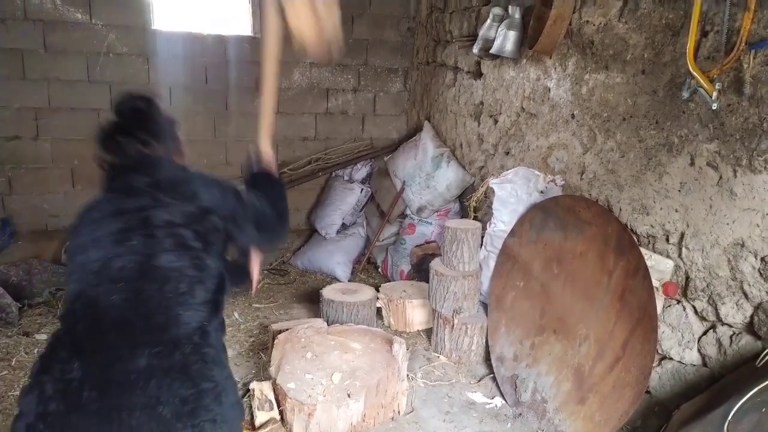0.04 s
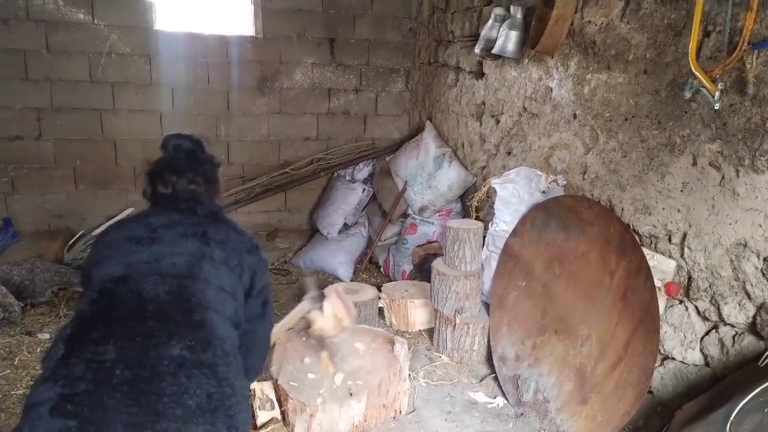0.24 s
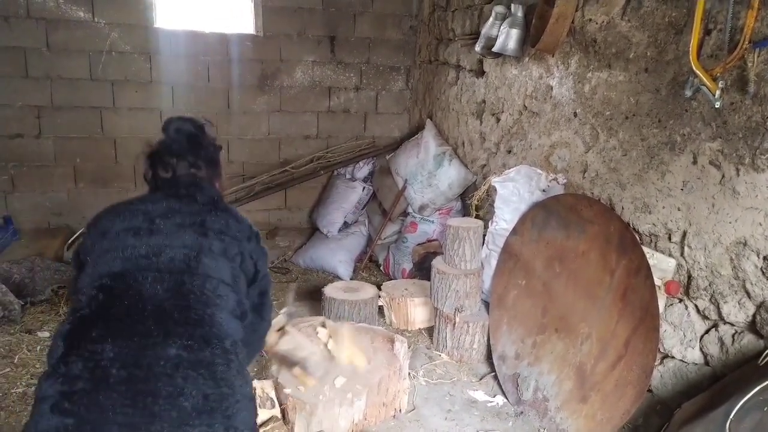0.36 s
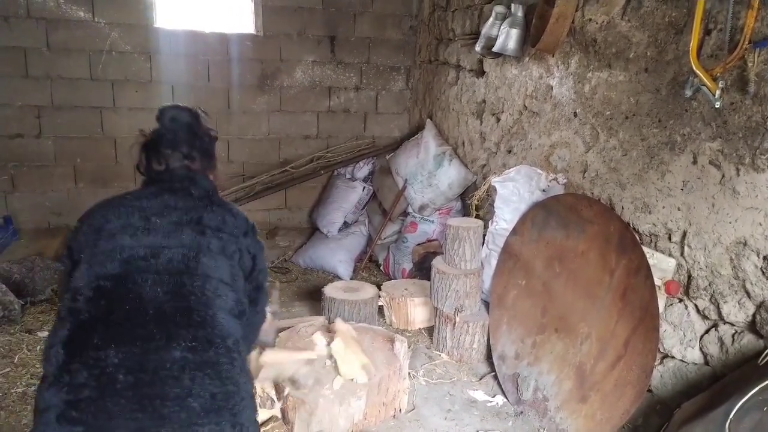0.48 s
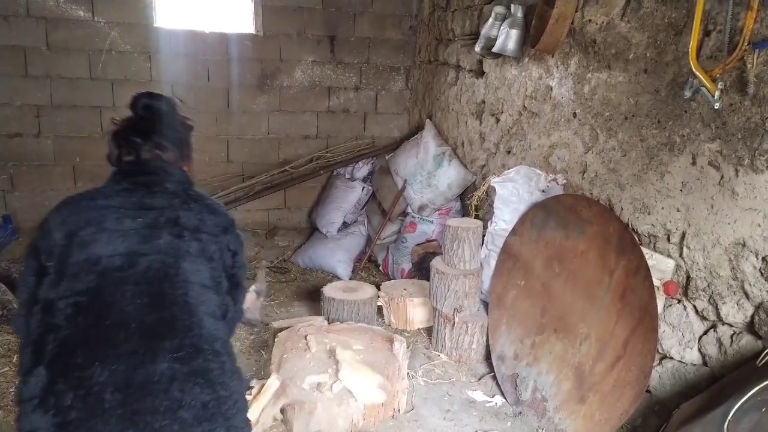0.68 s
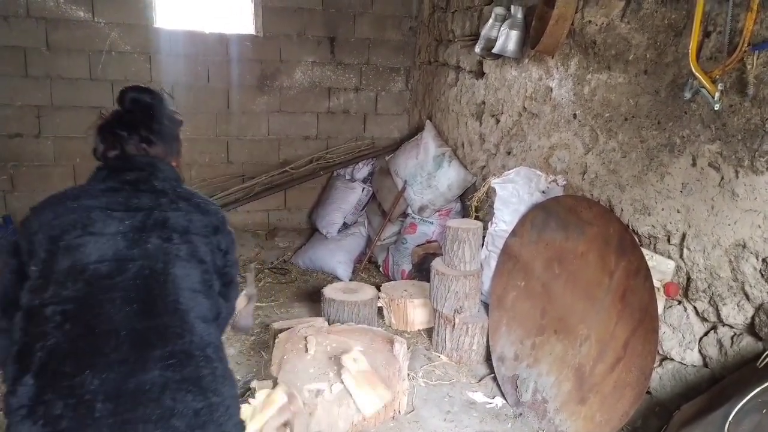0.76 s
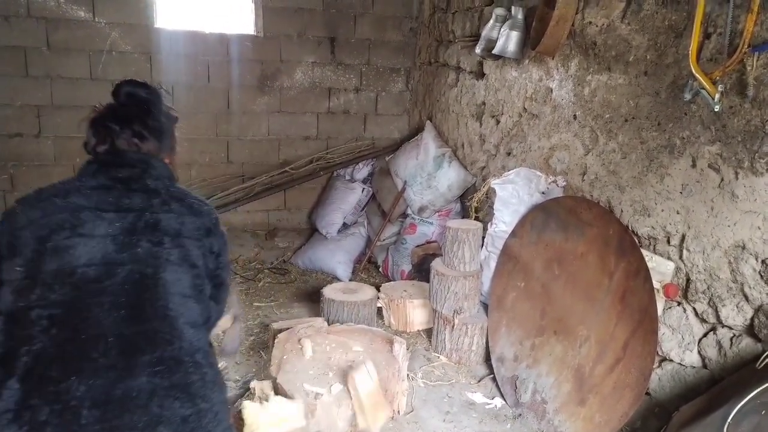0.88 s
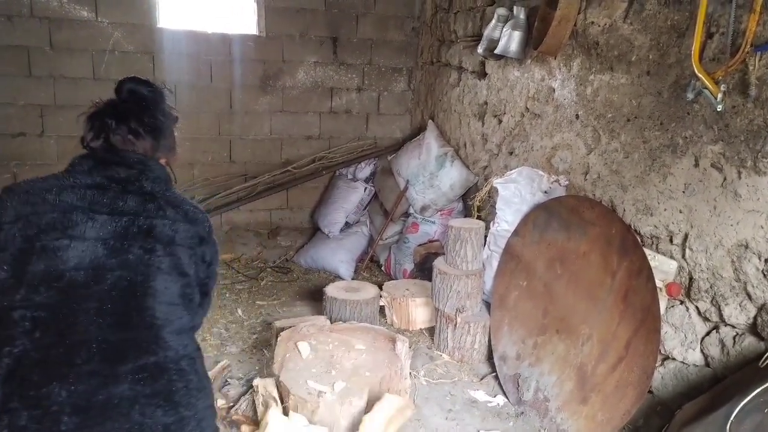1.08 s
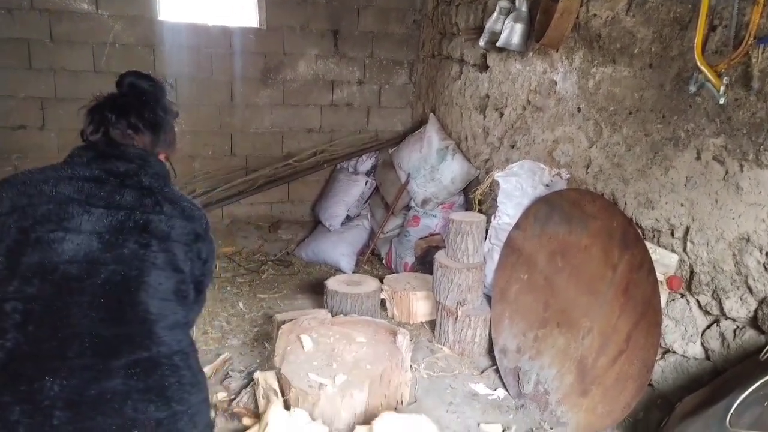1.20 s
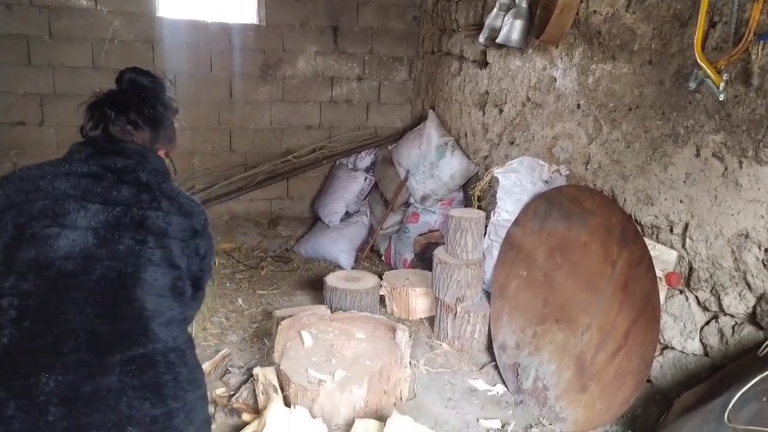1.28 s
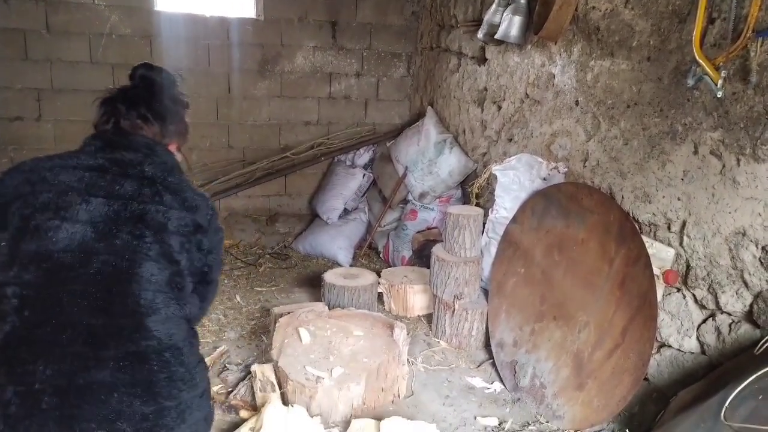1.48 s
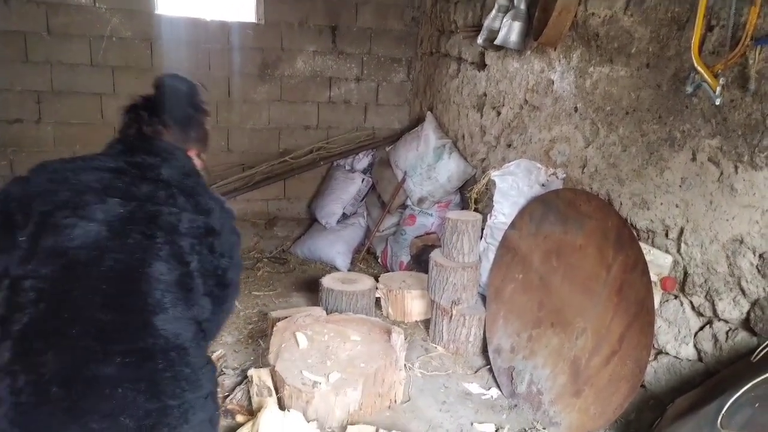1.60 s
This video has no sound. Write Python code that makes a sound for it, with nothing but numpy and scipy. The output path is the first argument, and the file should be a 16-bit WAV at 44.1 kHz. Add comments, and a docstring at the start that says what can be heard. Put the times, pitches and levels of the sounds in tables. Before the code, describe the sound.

Faint hiss, then at 0.24 s a loud axe blow bites into a log, fibres cracking until about 0.32 s over a booming, shuddering block. Light landings follow from 0.46 s, with a bright wood clack at 0.68 s. Thuds and grit sound around 1.0 s; a heavier half log tumbles in quick knocks at 1.31-1.38 s. Clothes and straw rustle; small stone barn, short reverberation, wide stereo.

```python
"""An axe splits a log on a chopping block in a small stone barn, its near walls answering about 10 ms later.
Shaped noise makes the bite, the tearing fibres and the shudder; damped modes make the booming block.
Split pieces clack (snap and ring), a half log tumbles (modes on shifting pitches), and landings on the
gritty earth floor thud, knock and crunch (coloured noise). At the microphone lie a mid/side stereo
picture, a rustle of clothes and straw, and a faint hiss, both diffuse noise."""
import sys
import numpy as np
from scipy import signal
from scipy.fft import rfft, irfft
from scipy.io import wavfile

SR = 44100
rng = np.random.default_rng(int(sys.argv[2]) if len(sys.argv) > 2 else 0)


def master_out(mix):
    """Clip the mix to full scale and print it as 16-bit PCM to the path in sys.argv[1]."""
    frames = np.transpose(np.atleast_2d(mix))
    ceiling = np.clip(frames, -1, 1)
    pcm = np.round(ceiling * 32767).astype(np.int16)
    wavfile.write(sys.argv[1], SR, pcm)


N = 72765

# Colours below are spectra. Each row: frequency in Hz, relative level in dB per Hz.
# Hold and fade shape a contact before its spectrum is evened out, which steepens the final fade.

# The blow: the blade bites, the fibres tear, block and floor shudder on.
# Each holds: delay after the blow in seconds, hold in seconds, fade in seconds, energy in dB.
BITE = (0, .0055, .018, -30.8)
TEAR = (0, .056, .075, -27.4)
RUMBLE = (0, 0.12, 0.96, -38.5)
# Colours of bite, tear and shudder. Each row: frequency in Hz, relative level in dB per Hz.
BITE_COLOUR = [(30, -32), (300, -19), (700, -9), (1100, 0), (2200, -1), (3200, -8), (6000, -12),
               (9000, -9.5), (11000, -18), (16000, -26)]
TEAR_COLOUR = [(25, -34), (45, -19), (70, -8.5), (150, -9), (330, 0), (520, -4), (850, 1), (1200, -5.5),
               (2200, -7), (3000, -15), (4500, -13), (6700, -17), (9000, -9), (10800, -24), (15500, -34)]
RUMBLE_COLOUR = [(25, -3), (65, 2.5), (130, -9), (300, -6.5), (600, 1), (1000, -2), (2200, -8.5),
                 (3200, -22.5), (9000, -22.5), (15000, -43)]
CHOP_S = .2394
BLOW_GRAIN_DB = 3.5  # unevenness of the noise grains in all three
BITE_ROOM_DB, TEAR_ROOM_DB, RUMBLE_ROOM_DB = -5.5, -4, -2  # echoes against the direct sound

# Bundles of fibres giving way down the log. Each row: start in seconds, energy in dB.
FIBRE_CRACKS = [(.2485, -38.5), (.2585, -39), (.2690, -36), (.2880, -36), (.3050, -42), (.3225, -45.5)]
# Colour of a fibre crack. Each row: frequency in Hz, relative level in dB per Hz.
CRACK_COLOUR = [(30, -29.5), (70, -5), (150, -10), (330, 1), (520, -4), (850, -0.5), (1300, -11.5),
                (2200, -10), (3000, -22), (9000, -29), (15500, -46.5)]
CRACK_HOLD_S, CRACK_FADE_S, CRACK_ROOM_DB = 0.00447, .008, -5.5

# Modes of block and log under the blow. Each row: frequency in Hz, energy in dB, 60 dB decay in seconds.
BLOCK_MODES = [(66.8, -47.5, 0.38), (173.7, -48.5, 0.25), (269, -48.5, 0.15), (301.4, -38, 0.2),
               (362, -42, 0.1), (399.3, -46, 0.19), (431.5, -48, 0.45), (591, -39.5, .068),
               (660, -47, 0.16), (717, -47, .27), (761, -43, 0.11), (840, -49.5, 0.238), (965, -44, 0.17)]
BLOCK_DELAY_S, BLOCK_RISE_S, BLOCK_ROOM_DB = 0.00398, 0.007, -6.5

# Dry pieces striking each other.
# Each row: start in seconds, contact length in seconds, ring energy in dB, snap energy in dB, snap room in dB.
CLACKS = [(0.5551, 0.0032, -46, -43, 1), (0.6761, 0.00255, -33, -32.5, 1), (0.88, 0.0026, -84, -60.5, -1.5),
          (1.0053, 0.0043, -55, -58, -2)]
# Modes of a piece. Each row: frequency in Hz, relative energy in dB, 60 dB decay in seconds.
PIECE_MODES = [(1525, -11, 0.015), (2188, 0, .009), (4350, -9, 0.008), (6040, -11.5, 0.011),
               (7790, -6.5, .008), (9010, -9, .011)]
# Colour of the snap. Each row: frequency in Hz, relative level in dB per Hz.
SNAP_COLOUR = [(60, -25.5), (600, -17.5), (1000, -8.5), (1500, -4.5), (2200, -1.5), (2500, -0.5),
               (3100, -8.5), (4500, -6), (6500, -4.5), (8200, 5), (9500, -1), (10800, -9.5), (15500, -22)]
RING_RISE_SHARE = 0.59  # of the contact length
RING_ROOM_DB, SNAP_FADE_S = -4.5, 0.0058

# A heavy half of the log toppling, edge after edge. Each row: start in seconds, pitch in Hz, energy in dB.
TUMBLES = [(1.3102, 2080, -45), (1.3173, 1550, -44.5), (1.3251, 1276, -39), (1.3325, 821, -44),
           (1.3468, 1423, -43.5), (1.357, 1090, -52), (1.3785, 1460, -50)]
# Modes of the half log. Each row: multiple of the pitch, relative energy in dB, 60 dB decay in seconds.
HALF_LOG_MODES = [(.55, -13, .016), (1, 0.5, .014), (1.27, -5.5, 0.014), (1.8, -13, .008)]
TUMBLE_RISE_S, TUMBLE_ROOM_DB = .0007, -6.5

# Wood landing and rolling on the floor. Each row: start in seconds, scrape length in seconds,
# thud pitch in Hz, then the energies of thud, knock and grit in dB.
LANDINGS = [ (0.462, 0.033, 300, -54.5, -56, -62), (0.487, 0.018, 102, -55, -72, -76),
            (0.537, 0.013, 448, -67.5, -67, -61.5), (0.6429, .024, 303, -56, -57.5, -47.5),
            (.668, 0.023, 156, -60, -57, -67), (.765, 0.0194, 169, -68, -66, -69),
            (1.0058, .006, 306, -51.5, -54.5, -54), (1.0105, 0.011, 295, -52, -54.5, -47.5),
            (1.027, 0.024, 152, -58, -59, -60.5), (1.123, 0.036, 292, -59.5, -64.5, -60),
            (1.146, .045, 211, -65, -63, -73), (1.308, .016, 330, -70, -47.5, -49.5),
            (1.327, .008, 295, -44.5, -41.5, -53.5), (1.332, 0.017, 188, -47.5, -42, -48),
            (1.346, 0.0084, 160, -47.5, -50, -54.5), (1.38, 0.039, 191, -68, -56.5, -46.5),
            (1.466, 0.046, 243, -57.5, -60, -58), (1.621, .03, 260, -60.5, -67.5, -62.5)]
# Colour of a thud on earth. Each row: multiple of the pitch, relative level in dB per Hz.
THUD_COLOUR = [(.15, -27.5), (.55, -12), (1, 1), (1.4, -9), (3, -24.5), (12, -57)]
# Colours of knock and grit. Each row: frequency in Hz, relative level in dB per Hz.
KNOCK_COLOUR = [(25, -42.5), (60, -30), (150, -14.5), (450, -6), (700, -0.5), (950, -1), (1300, -3.5),
                (1600, 1), (1850, -4.5), (2200, -0.5), (3000, -15.5), (5000, -16), (12000, -45)]
GRIT_COLOUR = [(30, -41), (100, -24), (1000, -18.5), (2300, -1), (3300, -8.5), (4500, -8), (6500, -2),
               (8200, 0.5), (9500, 3), (10600, -12), (15500, -23)]
THUD_FADE_S, KNOCK_FADE_S, GRIT_FADE_S = 0.019, 0.017, 0.039
KNOCK_GRAIN_DB, GRIT_GRAIN_DB = 2.5, 4.5
THUD_ROOM_DB, LANDING_ROOM_DB = -5.5, -2.5

# Rustle of clothes and straw. Each row: time in seconds, rms level in dB.
RUSTLE_LEVEL = [(0, -70.5), (.11, -63), (.135, -56), (.16, -67), (.3, -49), (.42, -45.5), (.53, -52.5),
                (.7, -51), (.84, -58.5), (.91, -53), (.98, -59.5), (1.2, -57), (1.29, -53), (1.43, -40.5),
                (1.54, -45.5), (1.65, -46.5)]
# Colours of rustle and hiss. Each row: frequency in Hz, relative level in dB per Hz.
RUSTLE_COLOUR = [(60, -3), (200, -3.5), (330, -1), (470, 2), (620, -3), (900, -5), (2200, -2), (3300, -9),
                 (5500, -7), (8000, -1), (9700, -.5), (10400, -16.5), (15500, -30.5)]
HISS_COLOUR = [(15, 21.5), (35, 10.5), (80, 2.5), (300, 1.5), (600, -5.5), (2000, -10.5), (5000, -22),
               (8500, -13), (9800, -10), (11000, -18), (15500, -22)]
RUSTLE_GRAIN_DB, HISS_DB = 1.5, -60.5

# Reverberation of the barn. Each row: frequency in Hz, 60 dB decay in seconds.
BARN_T60 = [(60, 0.38), (250, 0.22), (550, 0.3662), (900, 0.24), (2000, 0.2427), (5000, 0.1939),
            (9000, 0.1541), (15000, 0.2163)]
# Stereo width of echoes and background. Each row: frequency in Hz, side over mid in dB.
WIDTH = [(40, -9), (130, -15.5), (300, -12), (600, -6.5), (1100, 1.5), (2500, -0.5), (8000, 1), (15000, -1)]
WALL_S, WALL_SPREAD_S, TAIL_RISE_S = 0.0072, 0.0053, 0.006
WALL_DB = -5.5  # wall cluster against the tail
DIRECT_SIDE_DB = -2  # on top of WIDTH, for the direct sound

# A contact first swells for a share of its hold, then sags by this many dB (before the evening out).
SWELL_SHARE, SAG_DB = .1, -3.4
CEILING, EDGE_HZ = .9, 15700  # full scale = 1; upper band edge


def chop():
    """The blade bites, the log tears open in a run of cracks, and the block booms and shudders."""
    out = np.zeros((2, N))
    layers = [
        (BITE, BITE_COLOUR, BITE_ROOM_DB),
        (TEAR, TEAR_COLOUR, TEAR_ROOM_DB),
        (RUMBLE, RUMBLE_COLOUR, RUMBLE_ROOM_DB)]
    for (delay, hold, fade, db), points, room_db in layers:
        contact = burst(hold, fade, BLOW_GRAIN_DB, points)
        add(out, CHOP_S + delay, amp(db) * barn(contact, room_db))
    for start, db in FIBRE_CRACKS:
        crack = burst(CRACK_HOLD_S, CRACK_FADE_S, 0, CRACK_COLOUR)
        add(out, start, amp(db) * barn(crack, CRACK_ROOM_DB))
    boom = ring(BLOCK_MODES, BLOCK_RISE_S)
    add(out, CHOP_S + BLOCK_DELAY_S, barn(boom, BLOCK_ROOM_DB))
    return out


def clacks():
    """Wood on wood: a hard noise snap and a brief modal ring, whose rise grows with contact length."""
    out = np.zeros((2, N))
    for start, contact, ring_db, snap_db, room_db in CLACKS:
        piece = unit(ring(PIECE_MODES, RING_RISE_SHARE * contact))
        snap = burst(contact, SNAP_FADE_S, 0, SNAP_COLOUR)
        add(out, start, amp(ring_db) * barn(piece, RING_ROOM_DB))
        add(out, start, amp(snap_db) * barn(snap, room_db))
    return out


def tumble():
    """The half log rings at a different pitch with each edge that hits."""
    out = np.zeros((2, N))
    for start, hz, db in TUMBLES:
        modes = [(hz * multiple, mode_db, t60) for multiple, mode_db, t60 in HALF_LOG_MODES]
        knock = unit(ring(modes, TUMBLE_RISE_S))
        add(out, start, amp(db) * barn(knock, TUMBLE_ROOM_DB))
    return out


def landings():
    """Each landing thuds on the earth, knocks in the wood and crunches chips and grit."""
    out = np.zeros((2, N))
    for start, length, hz, thud_db, knock_db, grit_db in LANDINGS:
        thud_points = [(hz * multiple, db) for multiple, db in THUD_COLOUR]
        thud = amp(thud_db) * burst(length, THUD_FADE_S, 0, thud_points)
        knock = amp(knock_db) * burst(length, KNOCK_FADE_S, KNOCK_GRAIN_DB, KNOCK_COLOUR)
        grit = amp(grit_db) * burst(length, GRIT_FADE_S, GRIT_GRAIN_DB, GRIT_COLOUR)
        add(out, start, barn(thud, THUD_ROOM_DB) + barn(knock + grit, LANDING_ROOM_DB))
    return out


def background():
    """Rustling of clothes and straw that swells and sinks, over steady hiss."""
    level = amp(np.interp(np.arange(N) / SR, *np.transpose(RUSTLE_LEVEL)))
    rustle = level * wash(RUSTLE_COLOUR, RUSTLE_GRAIN_DB)
    hiss = amp(HISS_DB) * wash(HISS_COLOUR, 0)
    return rustle + hiss


def wash(points, grain_db):
    """Diffuse stereo noise of rms one, from independent mid and side."""
    mid = colour(grains(N, grain_db), points)
    side = colour(colour(grains(N, grain_db), points), WIDTH)
    return unit(np.array([mid + side, mid - side])) * np.sqrt(2 * N)


def barn(x, room_db, size=40):
    """Places a sound in the barn, keeping its energy; the bass stays near the centre."""
    smear = unit(rng.standard_normal(size))  # under 1 ms of noise spreads the direct sound
    mid = x + amp(room_db) * signal.fftconvolve(x, echoes())[:len(x)]
    direct_side = amp(DIRECT_SIDE_DB) * np.convolve(x, smear)[:len(x)]
    echo_side = amp(room_db) * signal.fftconvolve(x, echoes())[:len(x)]
    side = colour(direct_side + echo_side, WIDTH)
    # energy is counted in seconds at full scale, averaged over both channels
    return unit(np.array([mid + side, mid - side])) * np.sqrt(2 * SR * np.sum(x ** 2))


def echoes(size=256):
    """A cluster of reflections off the near walls and a tail whose decay varies with frequency."""
    t = clock()
    tail_noise, wall_noise = rng.choice([-1., 1.], (2, len(t)))
    hz, frame_s, bins = signal.stft(tail_noise, SR, nperseg=size)
    decayed = bins * fall(frame_s, read(BARN_T60, hz)[:, None])
    tail = signal.istft(decayed, SR, nperseg=size)[1][:len(t)]
    tail = unit(tail * (1 - np.exp(-t / TAIL_RISE_S)))
    half_spread = WALL_SPREAD_S / 2
    wall = wall_noise * np.exp(-((t - WALL_S - half_spread) / half_spread) ** 2)
    return unit(tail + amp(WALL_DB) * unit(wall))


def burst(hold_s, fade_s, grain_db, points):
    """A contact of energy one: a run of tiny fractures that holds and dies; then its colour."""
    t = clock()
    swell = np.minimum((t + 1 / SR) / max(SWELL_SHARE * hold_s, 1e-5), 1)
    sag = amp(SAG_DB * np.minimum(t / max(hold_s, 1e-5), 1))
    shape = fall(np.maximum(t - hold_s, 0), fade_s) * swell * sag
    run = grains(len(t), grain_db) * shape
    for _ in range(3):  # even out the spectrum, then press the shape back on
        flat = irfft(np.exp(1j * np.angle(rfft(run))))
        run = flat * np.sqrt(shape)
    return unit(colour(run, points))


def ring(modes, rise_s):
    """Damped modes of a struck body, all set off together."""
    t = clock()
    onset = 1 - np.exp(-t / max(rise_s, 1e-5))
    total = np.zeros(len(t))
    for hz, db, t60 in modes:
        total += amp(db) * unit(onset * fall(t, t60) * np.sin(2 * np.pi * hz * t))
    return total


def grains(count, grain_db, size=24):
    """Noise whose strength jumps from one half-millisecond grain to the next."""
    strength = amp(grain_db * np.clip(rng.standard_normal(count // size + 1), -2, 2))
    return rng.standard_normal(count) * np.repeat(strength, size)[:count]


def colour(x, points, size=4096):
    """Causal minimum-phase filter with the given spectrum."""
    log_gain = np.log(amp(read(points, abs(np.fft.fftfreq(size, 1 / SR)))))
    spectrum = np.exp(np.conj(signal.hilbert(log_gain)))
    taps = np.fft.ifft(spectrum).real[:size // 2]
    return signal.fftconvolve(x, taps)[:len(x)]


def fall(t, t60):
    """Exponential decay by 60 dB in t60."""
    return np.exp(-np.log(1000) * np.minimum(t / np.maximum(t60, 1e-4), 10))


def clock(size=20000):
    """Time axis of one event, in seconds."""
    return np.arange(size) / SR


def read(points, hz):
    """Reads a table on a log-frequency axis."""
    f, value = np.transpose(points)
    return np.interp(np.log(hz + 1), np.log(f), value)


def amp(db):
    """Decibels to gain."""
    return 10 ** (np.asarray(db) / 20)


def unit(x):
    """Scales to an energy of one."""
    return x / np.sqrt(np.sum(x ** 2) + 1e-20)


def add(mix, s, sound):
    """Mixes a stereo sound in at time s, in seconds."""
    part = mix[:, max(round(s * SR), 0):][:, :sound.shape[1]]
    part += sound[:, :part.shape[1]]


def scene():
    """All sources together."""
    return chop() + clacks() + tumble() + landings() + background()


def record(dry):
    """The loudest peaks round off near full scale; then a low-pass limits the band."""
    soft = dry / (1 + (dry / CEILING) ** 6) ** (1 / 6)
    low_pass = signal.firwin(201, EDGE_HZ, window=("kaiser", 8), fs=SR)
    return signal.oaconvolve(soft, low_pass[None], "same")


dry = scene()
out = record(dry)
master_out(out)
```